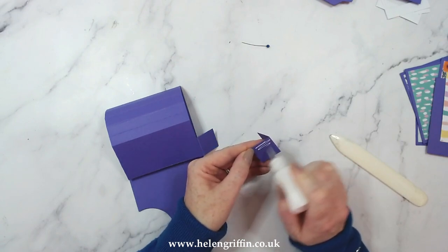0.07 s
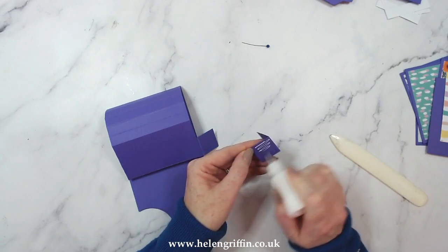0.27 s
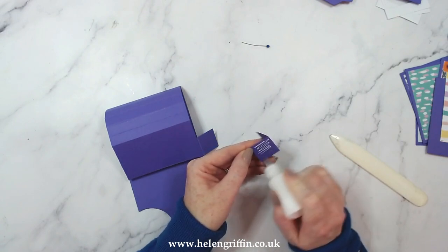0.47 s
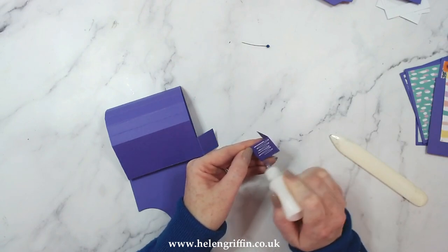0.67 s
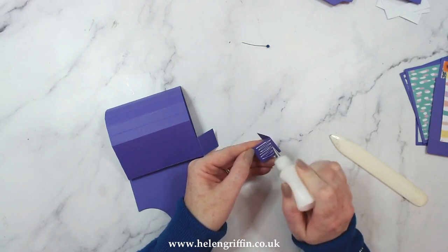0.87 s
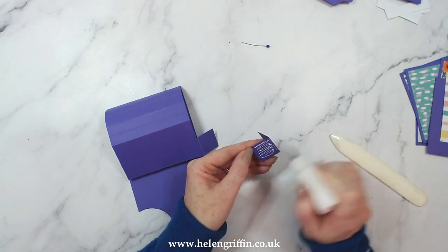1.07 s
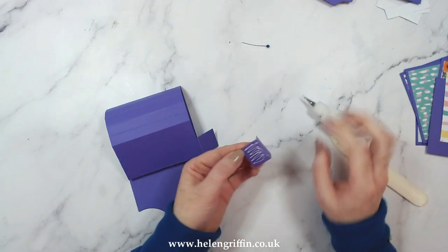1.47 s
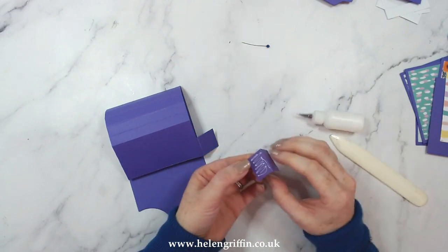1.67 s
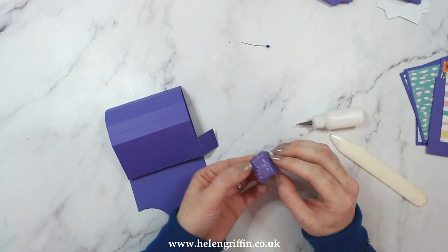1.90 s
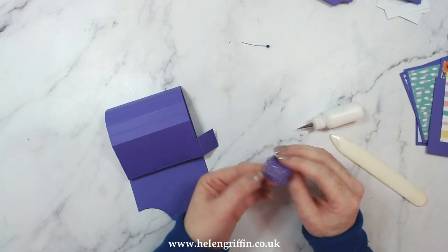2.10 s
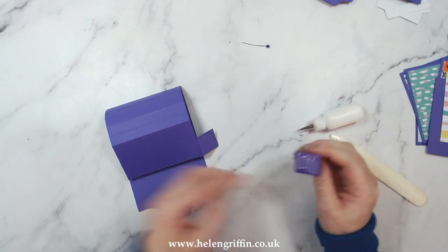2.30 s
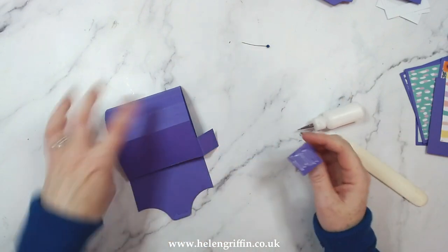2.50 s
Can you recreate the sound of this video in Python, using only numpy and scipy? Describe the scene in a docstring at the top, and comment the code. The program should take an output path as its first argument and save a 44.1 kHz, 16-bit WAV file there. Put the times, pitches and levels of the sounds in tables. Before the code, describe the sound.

Light scratching of a glue tip on card, followed by a bottle knocking on a tabletop.

```python
"""A table in a small room, one microphone close to a piece of card; a low throbbing hum and hiss throughout.
For the first second a glue bottle's nozzle scribbles to and fro, catching fibres and ringing the card.
At about 1.35 s the plastic bottle is laid down: it knocks on the table and rocks to rest.
From about 1.65 s to the end, fingers turn the card with soft rubs and faint snaps."""
import sys
import numpy as np
from scipy import signal
from scipy.fft import rfft, irfft, next_fast_len
from scipy.io import wavfile
from scipy.ndimage import uniform_filter1d, map_coordinates

SR = 44100
rng = np.random.default_rng(int(sys.argv[2]) if len(sys.argv) > 2 else 0)


def wav_record(signal):
    """Record a signal, one row per channel, as 16-bit PCM in the file named by sys.argv[1]."""
    frames = np.transpose(np.atleast_2d(signal))
    bounded = np.clip(frames, -1, 1)
    # unit amplitude maps onto the largest positive 16-bit level
    quanta = np.round(bounded * 32767).astype(np.int16)
    wavfile.write(sys.argv[1], SR, quanta)


N = 116865
TIME = np.arange(N) / SR


def amp(db):
    """Decibels to gain."""
    return 10 ** (np.asarray(db) / 20)


def unit(x):
    """Scale to rms 1."""
    return x / np.sqrt(np.mean(np.abs(x) ** 2) + 1e-20)


def along(points, hz):
    """Read (frequency [Hz], value) points on a log frequency axis."""
    knots_hz, values = np.transpose(points)
    return np.interp(np.log(hz + 1), np.log(knots_hz + 1), values)


def filtered(x, response):
    """Pass x through a response given as a function of frequency."""
    size = next_fast_len(N + SR // 2)
    return irfft(rfft(x, size) * response(np.fft.rfftfreq(size, 1 / SR)), size)[:N]


def coloured(x, spectrum):
    """Shape x with a spectrum, at rms 1."""
    return unit(filtered(x, lambda hz: amp(along(spectrum, hz))))


def wobble(rate):
    """A smooth random curve, rate knots a second."""
    return map_coordinates(rng.standard_normal(1024), [TIME * rate], mode="wrap")


def arch(start, length):
    """Speed of one stroke: it swells and falls back to rest."""
    progress = np.clip((TIME - start) / length, 0, 1)
    return np.abs(np.sin(np.pi * progress)) ** 0.94 * ((progress > 0) & (progress < 1))


def fade(start, t60):
    """A sudden start and an exponential decay."""
    age = TIME - start
    return (age >= 0) * np.exp(-np.log(1000) * np.maximum(age, 0) / t60)


# Swell of the hum: (time [s], level [dB])
HUM_SWELL = [(0.0, -46.5), (0.11, -42.5), (0.4, -42), (0.44, -44), (0.63, -39.5), (0.86, -44.5),
             (1.05, -39.5), (1.34, -42), (1.36, -37.5), (1.78, -43), (1.86, -36), (2.19, -45.5),
             (2.26, -37.5), (2.29, -44), (2.33, -39), (2.65, -45.5)]
# Harmonics of the throb: (multiple, relative level [dB])
HUM_HARMONICS = [(1, -0.5), (2, -7.5), (3, -19.5), (4, -25)]
# Faint steady tones: (frequency [Hz], level [dB])
WHINE_TONES = [(591, -74.5), (1181, -86)]
# Hiss of the room: (frequency [Hz], relative level [dB])
HISS_SPECTRUM = [(20, -1.5), (45, -3), (80, -3), (130, -6.5), (210, -10.5), (320, -15.5), (600, -22),
                 (1000, -24.5), (2000, -31), (4000, -35.5), (8000, -37), (11000, -37), (16000, -39)]


def room_tone(throb_hz=30.16, first_throb_s=0.006, hum_trim_db=-1, hiss_db=-50.5):
    """Behind the close sounds: a low throb that swells and sags, two faint tones and hiss."""
    drift_s = 0.0011 * wobble(rate=5.35)
    phase = 2 * np.pi * throb_hz * (TIME - first_throb_s + drift_s)
    throb = sum(amp(db + 1.5 * wobble(rate=7.91)) * np.cos(k * phase) for k, db in HUM_HARMONICS)
    throb *= amp(hum_trim_db + np.interp(TIME, *np.transpose(HUM_SWELL)))
    whine = sum(amp(db) * np.sin(2 * np.pi * hz * TIME + 0.13 * wobble(rate=4.3))
                for hz, db in WHINE_TONES)
    hiss = amp(hiss_db) * coloured(rng.standard_normal(N), HISS_SPECTRUM)
    return np.sqrt(2) * (throb + whine) + hiss


# Reverberation of the room: (frequency [Hz], t60 [s])
ROOM_DECAY = [(150, 0.86), (300, 0.21), (700, 0.16), (2000, 0.3), (10000, 0.37)]


def room_reverb(direct, delay_s=0.005):
    """The small room's tail, longest in the bass, reaches the microphone just after the direct sound."""
    hz, t, noise = signal.stft(rng.standard_normal(SR), SR, nperseg=256)
    decay = np.exp(-np.log(1000) * t / along(ROOM_DECAY, hz)[:, None])
    tail = signal.istft(noise * decay, SR, nperseg=256)[1]
    tail = np.pad(tail / np.linalg.norm(tail), (round(delay_s * SR), 0))
    return signal.fftconvolve(direct, tail)[:N]


def fibres(catches_per_s=2300, catch_share=0.29):
    """Friction on card: tiny random catches over a smooth rush."""
    catches = (rng.random(N) < catches_per_s / SR) * rng.standard_normal(N)
    return np.sqrt(catch_share) * unit(catches) + np.sqrt(1 - catch_share) * rng.standard_normal(N)


def friction(*bands):
    """Layers of fibre noise, one for each (envelope, spectrum) pair."""
    return sum(envelope * coloured(fibres(), spectrum) for envelope, spectrum in bands)


# Fingers sliding on the card: (start [s], length [s], skin rub [dB], edge whisper [dB], rustle [dB])
FINGER_RUBS = [(0.723, 0.12, -63.5, -63.5, -73), (1.048, 0.15, -61, -78, -70),
               (1.732, 0.13, -78, -66.5, -71), (1.875, 0.062, -67, -68, -73),
               (2.097, 0.084, -66, -66.5, -63.5), (2.177, 0.15, -60.5, -70, -72),
               (2.289, 0.14, -67.5, -72, -62.5), (2.403, 0.15, -62, -81, -72)]
# Small snaps of the card: (time [s], dull level [dB], crisp level [dB], t60 [s])
CARD_SNAPS = [(0.15, -54.5, -48, 0.068), (0.219, -55, -56.5, .05), (1.121, -62, -68, 0.037),
              (1.642, -74, -62, 0.043), (1.687, -71, -65, .015), (2.027, -79, -51.5, 0.015),
              (2.115, -62, -50, 0.045), (2.147, -52, -61, 0.071), (2.185, -52, -73, 0.077),
              (2.347, -77, -54.5, 0.083), (2.402, -54.5, -53.5, 0.032), (2.425, -55, -59, 0.053),
              (2.479, -62, -53, 0.035), (2.634, -52.5, -70, 0.048)]
# Skin, card edge, fine rustle and crisp snap, close up: (frequency [Hz], relative level [dB])
SKIN_SPECTRUM = [(150, -41), (400, 23.5), (1000, 5.5), (3000, 6), (5000, 2.5), (9000, -8), (16000, -5)]
EDGE_SPECTRUM = [(4500, -20), (6200, -7.5), (7000, -2), (7700, -9), (9500, -34)]
RUSTLE_SPECTRUM = [(5000, -28), (9000, -2), (10400, 8), (12500, -5), (16000, -12)]
CRISP_SPECTRUM = [(1500, -10), (4200, 5.5), (5200, 5), (6800, 10), (8500, 0), (11000, 10), (13000, 6.5),
                  (16000, -11)]


def fingers():
    """Near the microphone, fingers slide over the card and make it snap faintly."""
    skin, edge, rustle, crisp = np.zeros((4, N))
    for start, length, skin_db, edge_db, rustle_db in FINGER_RUBS:
        speed = arch(start, length)
        skin += amp(skin_db) * speed
        edge += amp(edge_db) * speed
        rustle += amp(rustle_db) * speed
    for start, dull_db, crisp_db, t60 in CARD_SNAPS:
        skin += amp(dull_db) * fade(start, t60)
        crisp += amp(crisp_db) * fade(start, t60)
    return friction((skin, SKIN_SPECTRUM), (edge, EDGE_SPECTRUM),
                    (rustle, RUSTLE_SPECTRUM), (crisp, CRISP_SPECTRUM))


# Bottle on table: (time [s], thud [dB], contact cut-off [Hz], shell click [dB], nozzle tick [dB])
BOTTLE_BLOWS = [(1.3385, -38.5, 2500, -37.5, -54), (1.3620, -14, 1280, -31.5, -38),
                (1.3703, -29.5, 1900, -35.5, -44), (1.3967, -25.5, 1190, -41, -56),
                (1.41, -35, 1800, -60, -64), (1.4247, -17.5, 660, -41.5, -43.5),
                (1.4559, -24.5, 353, -61, -65), (1.4756, -27, 355, -64, -77), (1.489, -27, 347, -52, -73),
                (1.518, -38, 596, -53, -72), (1.551, -53, 285, -71, -80), (1.625, -37.5, 277, -74, -80)]
# Modes of table top and bottle, one list a column: (frequency [Hz], relative level [dB], t60 [s])
THUD_HZ = [240, 352, 392, 586, 700, 900, 1045, 1160, 1415, 1615, 1725, 1848, 2030, 3080]
THUD_DB = [-1.5, -4.5, -8, -1.5, -5, -18, -11, -23, -15.5, -12.5, -12, -14, -16, -11]
THUD_T60_S = [0.055, 0.038, 0.048, 0.046, 0.055, 0.087, 0.038, 0.035, 0.054, 0.062, 0.049, 0.057, 0.025,
              .03]
# Shell click and nozzle tick: (frequency [Hz], relative level [dB])
CLICK_SPECTRUM = [(200, 14), (800, -4), (1900, 4.5), (2300, 0.5), (3100, -2), (3900, -8), (5000, -12),
                  (7000, -16), (16000, -33)]
TICK_SPECTRUM = [(1500, -18), (3800, 2.5), (5500, -7), (7200, -3.5), (9000, -7), (11000, 2.5), (16000, -7)]


def bottle(attack_s=0.00057):
    """The plastic bottle lands on the table close by and rocks; softer contacts ring only low modes."""
    t = np.arange(SR // 2) / SR
    hz, db, t60 = np.array([THUD_HZ, THUD_DB, THUD_T60_S])[:, :, None]
    attack = (1 - np.exp(-t / attack_s)) ** 2
    modes = np.sin(2 * np.pi * hz * t) * np.exp(-np.log(1000) * t / t60) * attack
    thud, click, tick = np.zeros((3, N))
    for start, thud_db, cutoff_hz, click_db, tick_db in BOTTLE_BLOWS:
        contact_lowpass = 1 / np.sqrt(1 + (hz / cutoff_hz) ** 6)
        weights = amp(thud_db + db + rng.normal(0, 1, db.shape)) * contact_lowpass
        thud[round(start * SR):][:len(t)] -= (weights * modes).sum(0)
        click += amp(click_db) * fade(start, t60=0.034)
        tick += amp(tick_db) * fade(start, t60=0.025)
    click *= coloured(rng.standard_normal(N), CLICK_SPECTRUM)
    tick *= coloured(rng.standard_normal(N), TICK_SPECTRUM)
    return thud + click + tick


def card_flex(x, depth_db=4.5):
    """The flexing card favours narrow bands that change from moment to moment."""
    spectra = signal.stft(x, nperseg=512)[2]
    patches = uniform_filter1d(rng.standard_normal(spectra.shape), size=3, axis=0)
    patches = uniform_filter1d(patches, size=4, axis=1)
    flexed = signal.istft(spectra * amp(depth_db * unit(patches)), nperseg=512)[1][:N]
    return unit(flexed) * np.std(x)


def ring_noise(width_hz=490):
    """One resonance fed by friction: a complex noise band around 0 Hz, ready to shift to a pitch."""
    real, imag = (unit(filtered(fibres(), lambda hz: 1 / (1 + 1j * hz / width_hz) ** 2))
                  for _ in range(2))
    return unit(real + 1j * imag)


# The card's stationary resonances: (frequency [Hz], width [Hz], level over the plain ring [dB])
CARD_RESONANCES = [(1370, 120, 3), (1900, 120, 0), (2520, 180, 4)]


def card_response(hz):
    """The card lifts the ring wherever it slides through a stationary resonance."""
    return 1 + sum(amp(db) * 1j * hz * width / (centre ** 2 - hz ** 2 + 1j * hz * width)
                   for centre, width, db in CARD_RESONANCES)


# Nozzle strokes: (start [s], length [s], card ring [dB], ring from [Hz], ring to [Hz], scratch [dB],
# scratch lag [s], edge whistle [dB], sizzle [dB], lag of whistle and sizzle [s])
NOZZLE_STROKES = [(-.02, 0.042, -70, 2420, 2250, -62, -0.0023, -65, -66, 0),
                  (0.04, 0.053, -55, 2292, 1254, -53, -0.01, -56.5, -56.5, -0.0016),
                  (0.144, .048, -53.5, 1453, 3053, -53, 0.003, -54.5, -64, 0.0065),
                  (0.21, 0.056, -55.5, 3070, 1820, -54.5, 0.0032, -52, -58, 0.016),
                  (0.315, 0.052, -55.5, 1527, 2930, -57.5, .004, -60, -68, 0.0047),
                  (0.391, 0.071, -62, 2580, 1510, -56.5, -0.0077, -58, -61, 0.0086),
                  (.493, 0.062, -54.5, 1390, 2253, -55, 0.013, -55, -59.5, 0.01),
                  (0.592, 0.056, -57.5, 2124, 1068, -60.5, -0.018, -56, -62.5, -0.027),
                  (.68, 0.0563, -53.5, 1960, 2305, -69, 0.042, -65, -70, 0.0081),
                  (0.8, 0.055, -58.5, 2000, 1546, -68, 0.0052, -65, -64, -0.00077),
                  (0.894, 0.084, -56, 1596, 2006, -64, 0.02, -67, -65, 0.0042),
                  (1.054, 0.028, -65, 2406, 2470, -68, -0.0085, -70, -69, 0.014),
                  (1.118, 0.015, -53.5, 2650, 2620, -68, -0.012, -76, -72, -0.0046)]
# Scratch and sizzle of the tip, close up: (frequency [Hz], relative level [dB])
SCRATCH_SPECTRUM = [(400, -25), (1100, 4.5), (2400, -5), (3300, -4.5), (3900, 4), (4300, 8), (4650, -1),
                    (5300, 7), (6100, -6.5), (7500, 5), (9000, -22), (16000, -22)]
SIZZLE_SPECTRUM = [(6000, -11), (8200, -14), (8700, -3), (9400, -5.5), (10500, 2), (11400, 4), (12000, -7),
                   (12600, 3), (13500, -9), (16000, -19)]


def nozzle(upper_ratio=1.75, upper_db=-14, grip_db=1.3):
    """Close up, the tip scratches the card, whose ring slides as the tip nears or leaves the fingers."""
    lower, upper = ring_noise(), ring_noise()
    ring, scratch, whistle, sizzle = np.zeros((4, N))
    for (start, length, ring_db, from_hz, to_hz,
         scratch_db, scratch_lag, whistle_db, sizzle_db, treble_lag) in NOZZLE_STROKES:
        on = (TIME > start) & (TIME < start + length)
        pitch_hz = np.interp(TIME[on], [start, start + length], [from_hz, to_hz])
        phase = 2 * np.pi * np.cumsum(pitch_hz) / SR
        lower_ring = lower[on] * np.exp(1j * phase)
        upper_ring = amp(upper_db) * upper[on] * np.exp(1j * upper_ratio * phase)
        ring[on] += amp(ring_db) * arch(start, length)[on] * (lower_ring + upper_ring).real
        scratch += amp(scratch_db) * arch(start + scratch_lag, length)
        treble_swell = arch(start + treble_lag, length)
        whistle += amp(whistle_db) * treble_swell
        sizzle += amp(sizzle_db) * treble_swell
    grit = friction((scratch, SCRATCH_SPECTRUM), (whistle, EDGE_SPECTRUM), (sizzle, SIZZLE_SPECTRUM))
    uneven_grip = amp(grip_db * wobble(rate=130))
    return filtered(ring, card_response) + card_flex(grit * uneven_grip)


def scene(reverb_db=-10):
    """Bottle and card close to the microphone, the room and its hum behind them."""
    direct = bottle() + nozzle() + fingers()
    return (direct + amp(reverb_db) * room_reverb(direct) + room_tone())[None]


def record(dry):
    """One microphone channel, with nothing above the recorder's band limit."""
    return filtered(dry[0], lambda hz: hz < 15950)[None]


dry = scene()
out = record(dry)
wav_record(out)
```